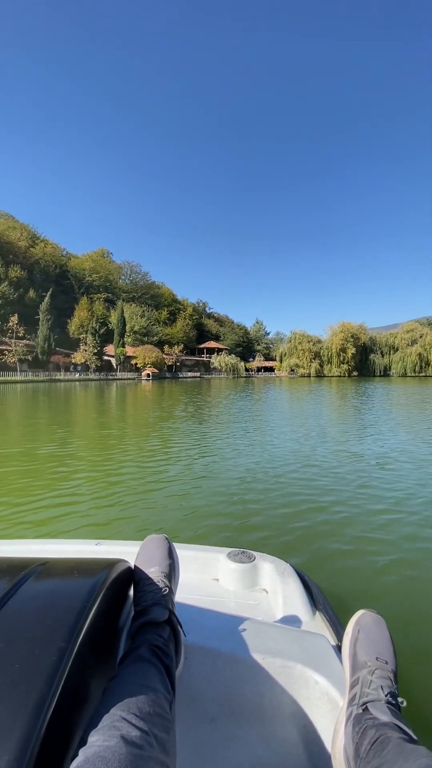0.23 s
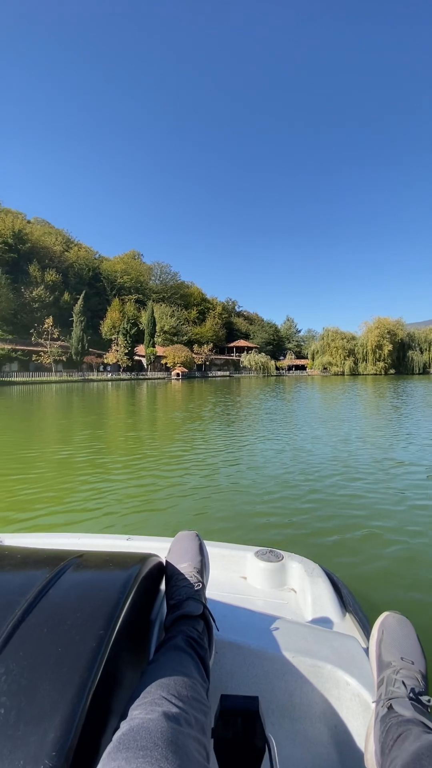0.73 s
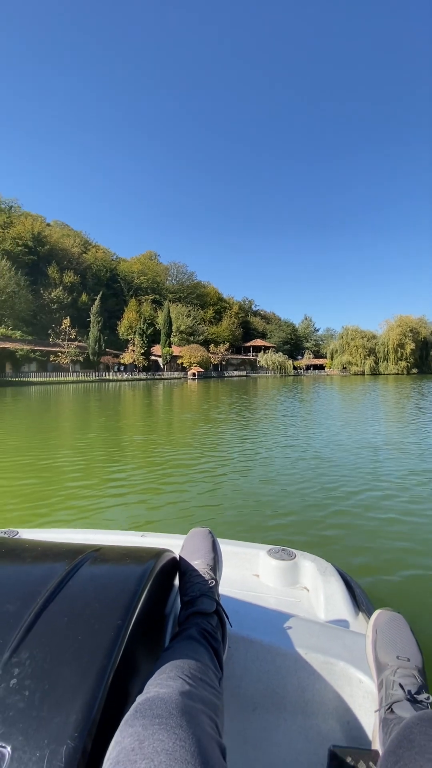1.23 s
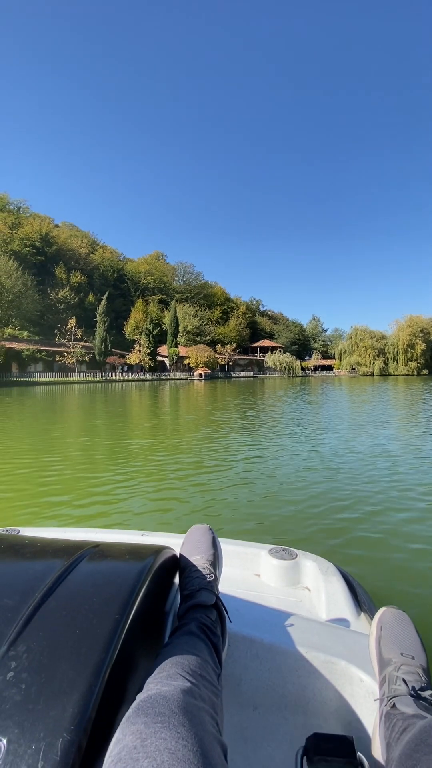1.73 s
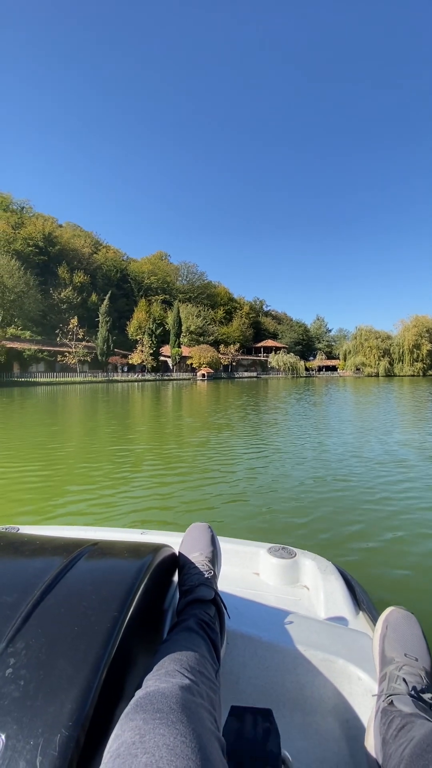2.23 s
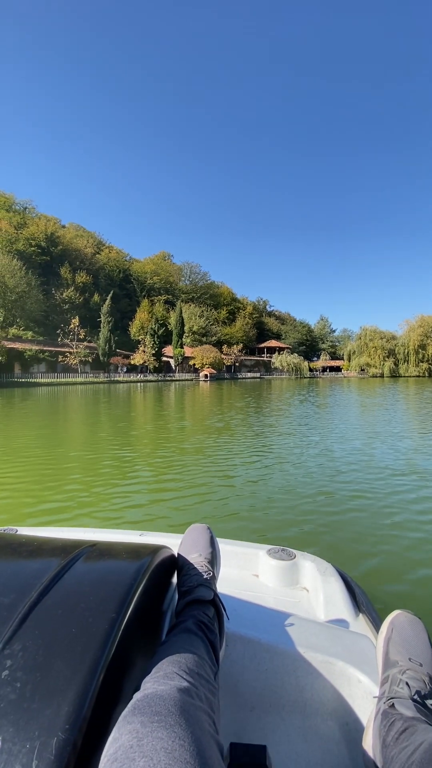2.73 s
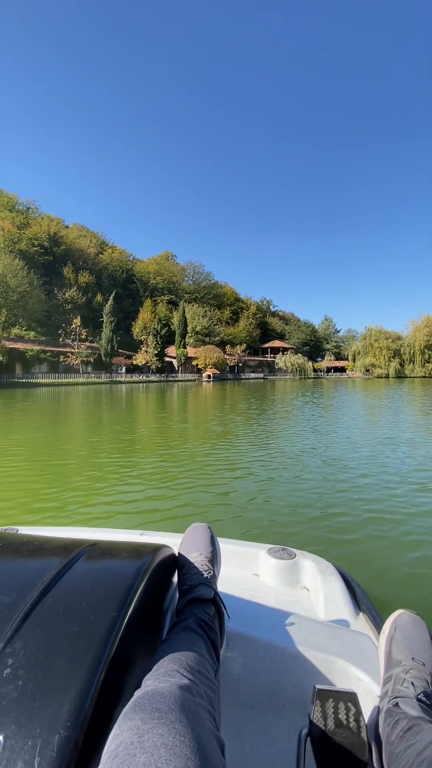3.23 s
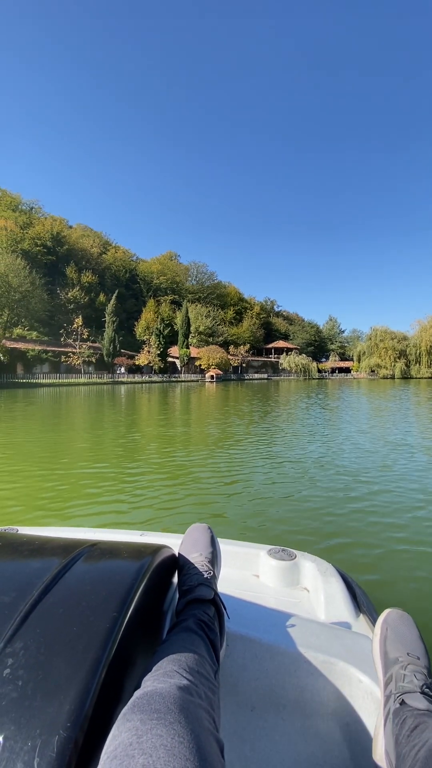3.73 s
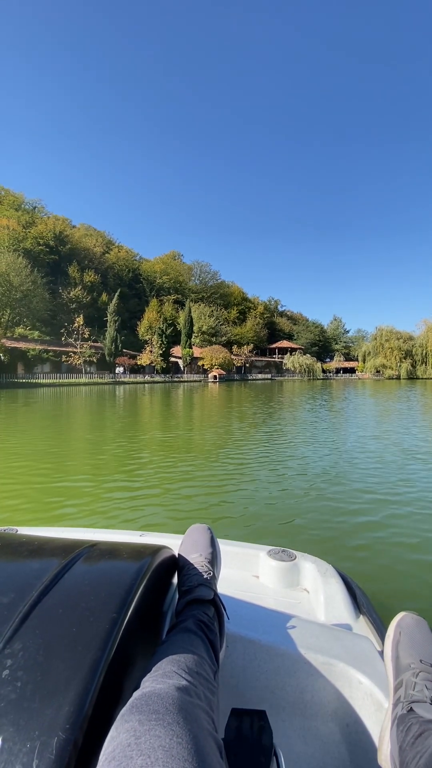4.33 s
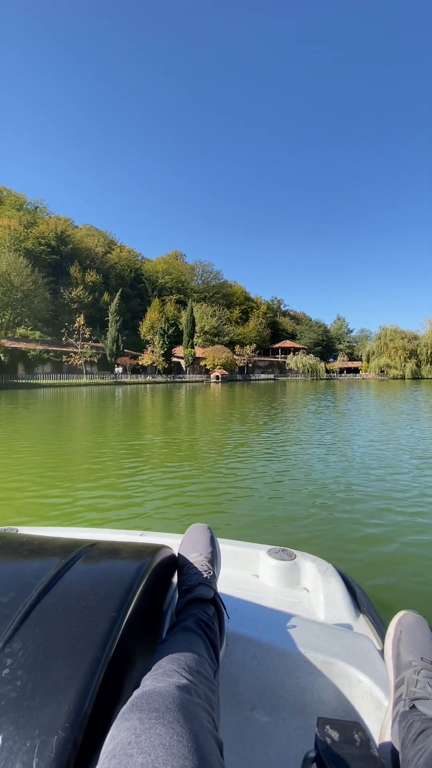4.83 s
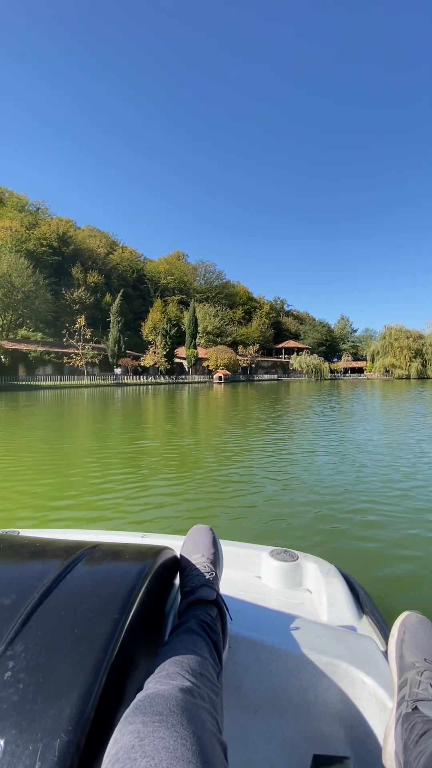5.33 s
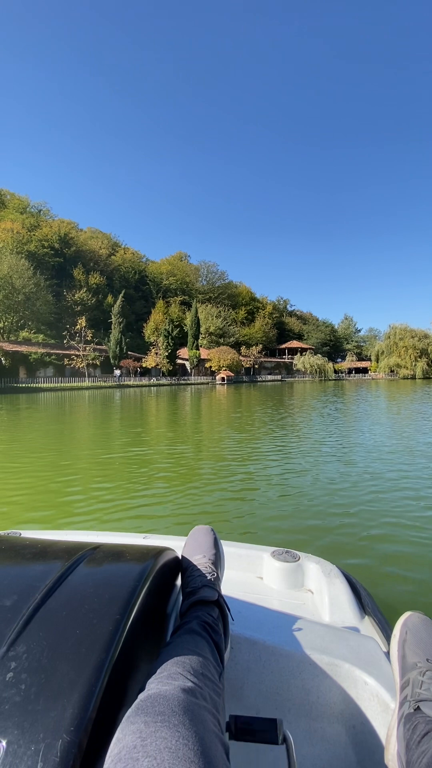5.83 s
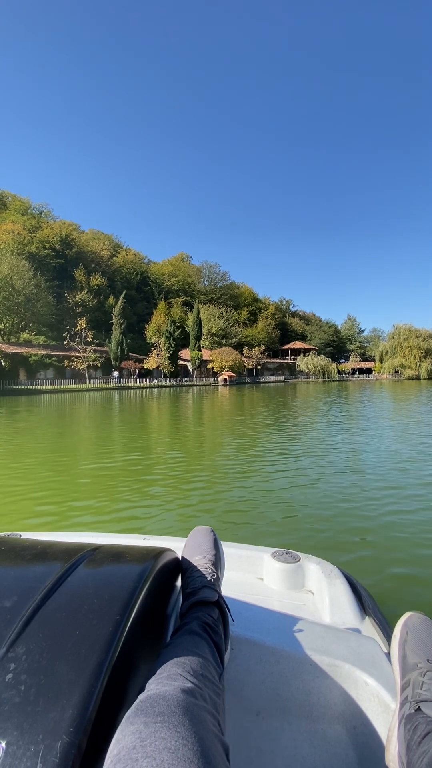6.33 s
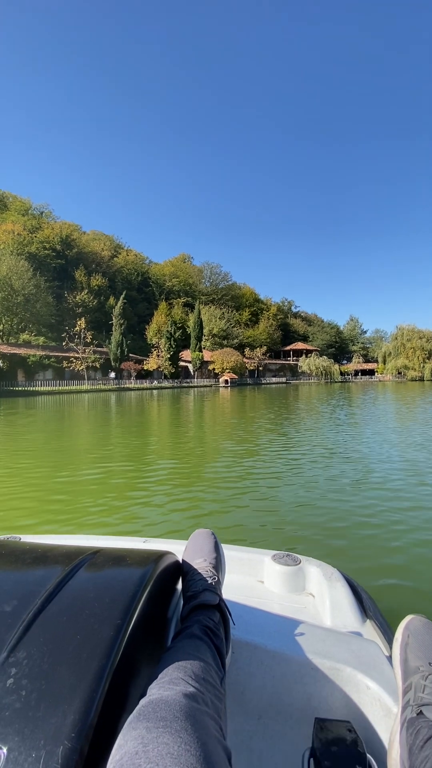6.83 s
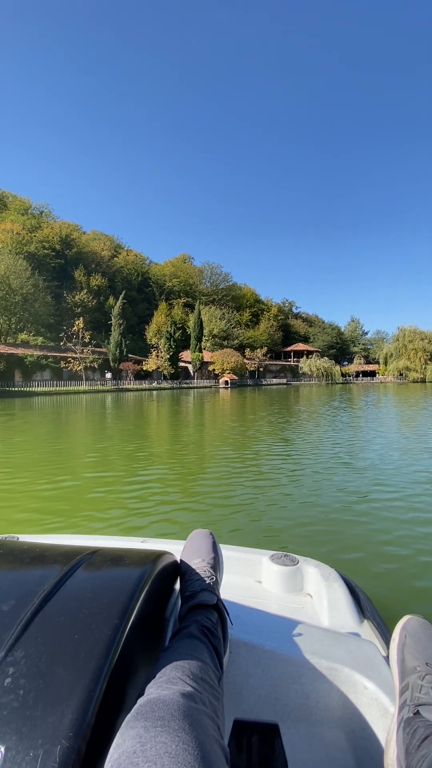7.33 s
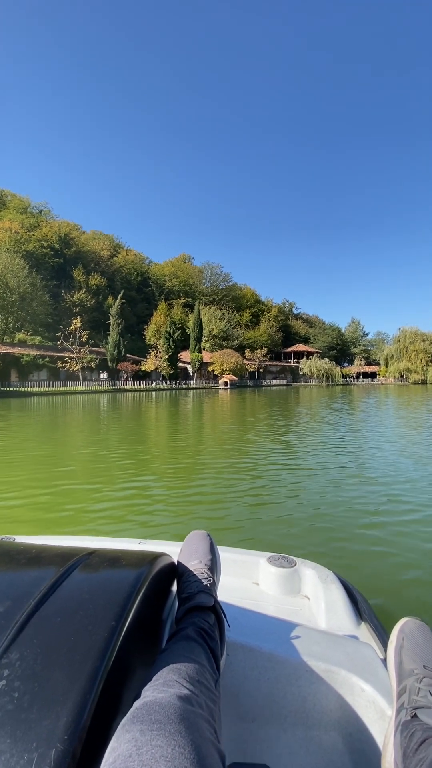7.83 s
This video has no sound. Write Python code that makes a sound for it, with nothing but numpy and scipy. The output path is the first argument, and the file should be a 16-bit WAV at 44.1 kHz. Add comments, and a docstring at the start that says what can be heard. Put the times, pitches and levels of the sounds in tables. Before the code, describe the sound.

Close, rhythmic splashing runs from start to finish as the paddle wheel of a pedal boat churns the lake. Each blade slaps in and pulls air under with a low gulp, and some land flat with a brighter smack. Around this slightly irregular beat, water fizzes, drips and gurgles, heaving against the hollow plastic hull and making small pings in the paddle housing.

```python
"""A pedal boat's paddles beat across a lake. Each blade splashes in, scatters drops and drags a pocket of
air under, which gulps at a low pitch while the slap rings the hollow plastic hull. The water shuts
over the pocket with a knock, and a blade that lands flat adds a bright crack. Wash, deep heaves, plops,
pings and gurgles run on between the beats, and the water keeps the hull and the paddle box ringing."""
import sys
import numpy as np
from scipy import signal
from scipy.fft import rfft, irfft
from scipy.io import wavfile

SR = 44100
rng = np.random.default_rng(int(sys.argv[2]) if len(sys.argv) > 2 else 0)


def waveform_to_disk(signal):
    """Save audio, clipped to [-1, 1], as 16-bit WAV at the path in sys.argv[1]."""
    frames = np.transpose(np.atleast_2d(signal))
    scaled = np.clip(frames, -1, 1) * 32767
    samples = np.round(scaled).astype(np.int16)
    wavfile.write(sys.argv[1], SR, samples)


N = 357210


def from_db(db):
    """Decibels to gain."""
    return 10 ** (np.asarray(db) / 20)


def rms_one(x):
    """Scale to unit rms."""
    return x / np.sqrt(np.mean(x ** 2) + 1e-20)


def drift(rate_hz):
    """Smooth random modulator, rms about 1: noise twice through a one-pole low-pass."""
    step, run_in = 40, 2000
    pole = np.exp(-2 * np.pi * rate_hz * step / SR)
    noise = rng.standard_normal(N // step + run_in + 2)
    slow = signal.lfilter([1], [1, -2 * pole, pole * pole], noise)[run_in:]
    return np.interp(np.arange(N) / step, np.arange(len(slow)), rms_one(slow))


def butter(hz, kind, order=2):
    """Butterworth filter sections."""
    return signal.butter(order, hz, kind, fs=SR, output="sos")


def ring(clicks, hz, t60):
    """Resonator: a unit click sets a sine of height 1 ringing."""
    r, w = from_db(-60 / (t60 * SR)), 2 * np.pi * hz / SR
    return signal.lfilter([0, np.sin(w)], [1, -2 * r * np.cos(w), r * r], clicks + 1e-18)


def add(out, s, sound):
    """Mix a short sound in at s seconds."""
    i = round(s * SR)
    out[..., i:i + sound.shape[-1]] += sound[..., :N - i]


def patchy_noise(eq, shared_db, shared_hz, own_db, own_hz):
    """Two noises in half-octave bands that swell partly together, partly alone, then an EQ; rms 1."""
    noise, together = 0, drift(shared_hz)
    edges = np.minimum(20 * 2 ** np.arange(0, 10.1, .5), 19000)
    white = rng.standard_normal((2, 2, N))
    for k in range(len(edges) - 1):
        band = signal.sosfilt(butter(edges[k:k + 2], "band"), white[k % 2])
        noise = noise + band * from_db(shared_db * together + own_db * drift(own_hz))
    hz, db = np.transpose(eq)
    grid = np.arange(N // 2 + 1) * SR / N + 1
    curve = from_db(np.interp(np.log(grid), np.log(hz), db))
    return rms_one(irfft(rfft(noise) * curve, N))


def fizz(per_s, low_hz, high_hz, cycles, spread_db):
    """Small bubbles burst at random and ring some cycles; two unrelated swarms, rms 1."""
    sizes = from_db(spread_db * np.minimum(rng.exponential(1, (2, N)), 5)) * rng.choice([-1, 1], (2, N))
    bursts = sizes * (rng.random((2, N)) < per_s / SR)
    pitch_index = rng.integers(0, 16, (2, N))
    pitches = np.geomspace(low_hz, high_hz, 16)
    return rms_one(sum(ring(bursts * (pitch_index == k), hz, cycles / hz) for k, hz in enumerate(pitches)))


def bubble(db, hz, length, glide_oct, attack, firm, trough_s=None):
    """A gliding sine, like a ringing pocket of air; firm 1 fades evenly, more holds and then collapses."""
    t = np.arange(round(4 * length * SR)) / SR
    pitch = hz * 2 ** (glide_oct * (np.minimum(t / length, 2) - .5))
    phase = 2 * np.pi * np.cumsum(pitch) / SR
    envelope = (1 - np.exp(-t / attack)) * np.exp(-(t / length) ** firm)
    start = rng.uniform(0, 2 * np.pi)
    if trough_s is not None:   # land a trough of the wave on that moment
        start = np.pi - np.interp(trough_s, t, phase)
    return from_db(db) * envelope * np.cos(phase + start)


# EQ of the rushing water: f/Hz, level/dB
WATER_EQ = [(100, 10), (160, 7), (230, 3), (400, 0), (700, -6.5), (1050, -8.5), (1250, -18), (1800, -17),
            (2550, -11), (3300, -11), (4200, -17), (5000, -14.5), (6500, -18.5), (8300, -21.5),
            (12000, -24.5), (15500, -31.5)]
# EQ of the rumble under the hull: f/Hz, level/dB
RUMBLE_EQ = [(25, -45), (38, -26), (55, 15), (75, 7.5), (110, -34), (200, -24), (500, -48)]
# fader rides of the wash: t/s, rumble level/dB, water level/dB
WASH_FADERS = [(0.0, -55, -44), (0.43, -44, -42.5), (0.95, -59, -45), (1.26, -52, -42), (1.69, -55, -43),
               (2.0, -69, -43), (2.3, -53, -43.5), (2.78, -52, -44), (3.09, -44, -42.5), (3.35, -61, -43),
               (4.31, -53, -46), (4.7, -41, -42.5), (5.21, -58, -43.5), (5.661, -55, -41.5),
               (5.96, -58, -45.5), (6.56, -60, -42), (6.88, -54, -43.5), (7.17, -60, -43.5),
               (8.1, -54, -45)]


def wash():
    """The bed: rumble under the hull, rushing water and scattered gurgles, long and short."""
    water = patchy_noise(WATER_EQ, shared_db=.64, shared_hz=13.5, own_db=2.9, own_hz=11.7)
    water += (churn() - 1) * signal.sosfiltfilt(butter(580, "low"), water)
    water += .11 * fizz(110, 192, 1063, cycles=45, spread_db=3.5)
    water += .18 * fizz(500, 900, 6000, cycles=50, spread_db=2.5)
    water += .2 * fizz(160, 550, 2000, cycles=20, spread_db=2.5)
    rumble = patchy_noise(RUMBLE_EQ, shared_db=1, shared_hz=2.7, own_db=.5, own_hz=11)
    s, rumble_db, water_db = np.transpose(WASH_FADERS)
    t = np.arange(N) / SR
    return from_db(np.interp(t, s, rumble_db)) * rumble + from_db(np.interp(t, s, water_db)) * water


def churn(depth_db=2):
    """Gain around 0 dB for the low wash, which swells behind each paddle and sinks before the next."""
    swells, t = np.zeros(N), np.arange(SR // 2) / SR
    for s, *_ in AIR_POCKETS:
        add(swells, s, (1 - np.exp(-t / .008)) * np.exp(-t / .06))
    return from_db(depth_db * rms_one(swells - swells.mean()))


# modes of the hollow plastic hull: f/Hz, level/dB, t60/s
HULL_MODES = [(266.4, 1, 0.15), (345.4, -8.5, 0.19), (380, -5, 0.11), (524.6, -13.5, 0.18),
              (617.7, -13.5, 0.25), (771, -16, 0.32), (1011, -20.5, 0.24), (4980, -45, 0.037)]


def hull_hum(water, level_db=-50, tilt_db_per_oct=4, wet_t60_share=.6):
    """Splashes and wash keep the hull modes gurgling fitfully, each mode in its own time."""
    hum = 0
    for hz, db, t60 in HULL_MODES:
        gain = from_db(db + tilt_db_per_oct * np.log2(hz / HULL_MODES[0][0]) + 5 * drift(12))
        hum = hum + gain * rms_one(ring(water, hz, wet_t60_share * t60))
    return from_db(level_db) * rms_one(hum)


def paddle_box(water, level_db=-62, modes_hz=(2420, 2490)):
    """Drops strike the box fitfully, as hard as the water is bright; its close modes ring in dashes."""
    strikes = signal.sosfilt(butter(1500, "high"), water) * rng.choice([-1, 1], water.shape)
    ringing = sum(ring(strikes * from_db(4 * drift(20)), hz, t60=.045) for hz in modes_hz)
    return from_db(level_db) * rms_one(ringing)


# EQ of the spray: f/Hz, level/dB
SPRAY_EQ = [(200, 15), (600, 14), (1050, 8.5), (1250, 2), (1800, -6.5), (2500, 3), (3300, 1.5), (4200, -10),
            (5200, -0.5), (7000, -9), (9000, -9.5), (12500, -16.5), (15500, -18)]
# paddles entering the water: t/s, level/dB, t60/s (capped at 0.6), treble gain/dB, attack/s
PADDLE_HITS = [(0.016, -50.5, 0.27, 8, 0.004), (0.178, -44.5, 0.36, 6.5, .01),
               (0.374, -51.5, 0.57, 11, 0.0023), (0.44, -62, .3, 3, 0.012), (0.612, -56, 0.19, 23, 0.013),
               (0.88, -46.5, 0.13, 11, 0.0046), (1.069, -43, 0.24, 2, 0.0039),
               (1.259, -40.5, 0.22, 8, 0.0014), (1.385, -57, 0.26, 17, .01), (1.463, -42, 0.34, 6, .004),
               (1.699, -44, 0.26, -15, 0.0092), (1.912, -46.5, 0.4, 1, 0.0057),
               (1.99, -56.5, 0.27, 18, 0.0072), (2.114, -41, 0.3, 5.5, 0.013), (2.334, -41, 0.22, 8, .005),
               (2.56, -43, 0.56, -1, 0.015), (2.777, -41.5, 0.29, 0.5, .006), (2.792, -53, 0.38, -1, .002),
               (2.979, -48.5, 0.52, 9.5, 0.0027), (3.19, -40.5, 0.28, 4, 0.0046),
               (3.464, -44, 0.19, 5.5, 0.0072), (3.648, -44.5, 0.66, 5, 0.0044),
               (3.85, -43.5, 0.3, 4.5, 0.0043), (3.907, -40.5, 0.18, -32, 0.0022),
               (4.069, -39, 0.22, 9, 0.024), (4.321, -41, 0.28, -3, 0.015), (4.537, -45, 0.43, -14, .004),
               (4.715, -39.5, 0.43, 1.5, 0.0046), (4.895, -45, 0.44, 6.5, 0.011),
               (4.921, -45, 0.49, 0, 0.0022), (4.975, -47, 0.29, -12, .003),
               (5.154, -42.5, 0.35, -17, 0.0048), (5.358, -43.5, 0.17, 1, 0.0017),
               (5.549, -49, 0.31, 11.5, 0.0028), (5.755, -43.5, 0.36, 7.5, 0.014),
               (5.813, -49, 0.17, -24, .003), (5.991, -45.5, 0.59, 5, .008), (6.202, -45.5, 0.71, 9, 0.011),
               (6.402, -48, 0.4, 9.5, 0.0031), (6.607, -45.5, 0.32, 0, 0.0036),
               (6.626, -50.5, 0.24, 8, .004), (6.723, -50, 0.22, 8, 0.005), (6.89, -44.5, 0.16, 6, 0.0045),
               (7.072, -47, 0.6, 1, 0.0073), (7.244, -45.5, 0.48, 9.5, 0.006),
               (7.452, -36, 0.27, 3.5, 0.018), (7.665, -42.5, 0.81, 0, 0.018), (7.893, -43, 0.46, 5, .002)]


def splashes():
    """Thrown water spatters and fizzes, with one envelope for its body and one for its treble."""
    envelopes, t = smack_envelopes(), np.arange(SR // 2) / SR
    # each slap also spits a little bright spray
    spits = [(s, slap_db - 32.5, .18, 17, .0093) for s, *_, slap_db in AIR_POCKETS]
    for s, db, t60, treble_db, attack in PADDLE_HITS + spits:
        burst = (1 - np.exp(-t / attack)) * from_db(db - 60 * t / min(t60, .6))
        add(envelopes, s, burst * from_db([[0], [treble_db]]))
    spray = patchy_noise(SPRAY_EQ, shared_db=1.96, shared_hz=60, own_db=2.5, own_hz=30)
    spray += .3 * fizz(900, 1500, 6500, cycles=28, spread_db=3)
    spray += .19 * fizz(320, 462, 1203, cycles=71, spread_db=3)
    low, high = (signal.sosfilt(butter(3000, kind), spray) for kind in ("low", "high"))
    body, treble = envelopes
    return body * low - treble * high


def drops(per_splash=24, low_hz=700, high_hz=6000, latest_s=.18, cycles=22):
    """Every splash scatters drops that tick 10 to 20 dB under it, thickest at the start."""
    out = np.zeros(N)
    for s, db, *_ in PADDLE_HITS:
        for late, small, high in rng.random((per_splash, 3)):
            hz = low_hz * (high_hz / low_hz) ** high
            tick = bubble(db - 10 - 10 * small, hz, cycles / hz, glide_oct=.025, attack=1.5 / hz, firm=1.2)
            add(out, s + latest_s * late ** 2, tick)
    return out


# air pulled under, one pocket a paddle, at times two: t/s, level/dB, f/Hz, length/s, slap level/dB
AIR_POCKETS = [(0.018, -32, 199, 0.071, -29), (0.235, -29.5, 158.5, 0.13, -26),
               (0.445, -35, 235, 0.047, -25.5), (0.635, -32, 319.5, 0.047, -30.5),
               (0.883, -41, 269, 0.067, -29), (1.138, -32, 146.8, 0.13, -26.5),
               (1.345, -23, 151.7, 0.063, -26.5), (1.516, -33, 253, 0.088, -27),
               (1.736, -31.5, 245, 0.062, -28), (1.986, -26, 158.4, 0.12, -32),
               (2.186, -25.5, 171.7, 0.073, -23), (2.383, -22.5, 266, 0.026, -28.5),
               (2.621, -27.5, 186.5, 0.035, -25.5), (2.844, -33, 164, 0.036, -28.5),
               (3.051, -27, 167.6, 0.055, -27.5), (3.17, -31, 150, 0.02, -55),
               (3.239, -29.5, 262.6, 0.06, -24), (3.467, -38, 203.5, 0.097, -29),
               (3.707, -24, 164.6, 0.056, -33), (3.902, -36, 222, 0.051, -31),
               (4.111, -33, 330, 0.027, -25.5), (4.274, -34, 380, 0.035, -34),
               (4.365, -30.5, 206, 0.039, -28.5), (4.598, -26.5, 147, 0.085, -26),
               (4.67, -43, 147, 0.061, -49), (4.801, -24.5, 156.5, 0.071, -28),
               (4.964, -38.5, 244, 0.12, -27), (5.2, -34.5, 184.3, 0.084, -27),
               (5.421, -29.5, 161, 0.079, -30), (5.609, -32.5, 168, 0.061, -27),
               (5.719, -39, 179, 0.07, -56), (5.813, -31.5, 292, 0.035, -24), (6.048, -30, 223, 0.05, -28),
               (6.278, -34, 172, 0.068, -30), (6.479, -26, 164, 0.046, -23.5),
               (6.671, -31, 249.4, 0.085, -24), (6.901, -31.5, 190.3, 0.083, -29),
               (7.128, -27.5, 159.5, 0.11, -26), (7.318, -28.5, 163.4, 0.11, -26),
               (7.505, -33, 279, 0.044, -22.5), (7.738, -37.5, 198, 0.056, -32),
               (7.964, -35, 174, 0.057, -32)]


def gulps():
    """A pocket wobbles and sags in pitch as it goes down; its wave dips as the water shuts over it."""
    out = np.zeros(N)
    for s, db, hz, length, _ in AIR_POCKETS:
        shut_s = next((at - s for at, _ in POCKET_SHUTS if 0 < at - s < .03), None)
        add(out, s, bubble(db, hz, length, glide_oct=-.15, attack=.007, firm=1.5, trough_s=shut_s))
    return out * from_db(1.6 * drift(37))


def slaps(shake_db=-27):
    """With each pocket a short rush of jolts slaps wetly and shakes the hull modes."""
    jolts, t = np.zeros(N), np.arange(SR // 10) / SR
    for s, *_, slap_db in AIR_POCKETS:
        add(jolts, s, from_db(slap_db) * (1 - np.exp(-t / .0041)) * np.exp(-t / .011))
    hull = np.zeros(N)
    for hz, mode_db, t60 in HULL_MODES:
        shake = jolts * rng.standard_normal(N) * from_db(shake_db + mode_db + 1.86 * drift(5))
        hull += ring(shake, hz, t60)
    return hull + signal.sosfilt(butter([150, 1000], "band"), jolts * rng.standard_normal(N))


# blades landing flat: t/s, level/dB
FLAT_SMACKS = [(0.21, -42), (0.375, -39.5), (1.485, -48), (2.341, -37.5), (2.794, -35), (2.981, -39),
               (3.857, -43), (4.542, -39), (4.719, -47), (4.81, -44), (4.923, -51), (5.361, -39),
               (5.429, -41), (5.552, -43), (6.405, -35), (6.63, -45), (7.703, -38.5), (7.975, -43)]


def smack_envelopes(attack_s=.0015, decay_s=.017, body_db=-15.5):
    """A flat blade cracks brightly: a snap in the spray's body and treble envelopes."""
    out, t = np.zeros((2, N)), np.arange(SR // 2) / SR
    snap = (1 - np.exp(-t / attack_s)) * np.exp(-t / decay_s)
    for s, db in FLAT_SMACKS:
        add(out, s - attack_s, from_db([[db + body_db], [db]]) * snap)
    return out


# water closing over a pocket: t/s, level/dB
POCKET_SHUTS = [(0.253, -26), (0.4511, -22), (0.6521, -29), (0.9005, -29.5), (1.1523, -25), (1.356, -35),
                (1.5331, -40), (1.747, -29), (2.0017, -48), (2.205, -40), (2.3999, -38), (2.6376, -37),
                (2.8568, -47), (3.0689, -46), (3.2565, -35), (3.4789, -31), (3.7198, -47), (3.9214, -24),
                (4.613, -43), (4.8173, -28), (4.9891, -27), (5.4356, -26.5), (5.6357, -22.5), (5.831, -32),
                (6.2886, -32.0), (6.4943, -24), (6.6839, -32.5), (7.1415, -27.5), (7.3409, -26.5),
                (7.5259, -42), (7.769, -27), (7.98, -38)]


def knocks(half_width_s=.0013, lead_s=.008):
    """The water shuts with a sharp knock: one downward pulse between two small swells."""
    out, t = np.zeros(N), np.arange(SR // 10) / SR
    offset_squared = ((t - lead_s) / half_width_s) ** 2
    knock = (offset_squared - 1) * np.exp(-offset_squared / 2)
    for s, db in POCKET_SHUTS:
        add(out, s - lead_s, from_db(db) * knock)
    return out


# heaves of water: t/s, level/dB, f/Hz
HULL_HEAVES = [(0.26, -29, 66), (0.386, -28, 64.5), (0.487, -37, 55.7), (0.758, -27, 65), (1.14, -46, 86),
               (1.284, -28, 75), (1.358, -27, 85), (1.589, -31, 62), (1.678, -28.5, 80),
               (2.21, -29.5, 78.5), (2.846, -36, 72), (3.073, -30, 77), (3.258, -45, 69), (3.703, -35, 78),
               (3.926, -29, 65), (4.497, -26, 55), (4.653, -24, 76), (4.86, -26.5, 89), (4.993, -28.5, 73),
               (5.054, -34, 64), (5.443, -34, 63), (5.637, -32, 57.3), (6.145, -35, 74), (6.352, -31, 70.5),
               (6.541, -31, 70.5), (6.933, -39, 62), (7.144, -33, 72), (7.326, -29, 72), (7.748, -29, 86),
               (7.988, -28, 71)]


def heaves():
    """Water heaves against the hull in soft, deep thumps."""
    out = np.zeros(N)
    for s, db, hz in HULL_HEAVES:
        add(out, s, bubble(db, hz, length=.032, glide_oct=-.099, attack=.013, firm=1.8))
    return out


# short pitched sounds that stand out: t/s, level/dB, f/Hz, length/s
PITCHED_ACCENTS = [(0.385, -39, 500, .02), (0.482, -37, 970, .022), (0.541, -44, 2250, .014),
                   (0.845, -48, 1450, .014), (0.991, -44, 950, .015), (1.08, -40, 506, .015),
                   (1.248, -40, 950, .015), (1.268, -39, 2430, .012), (1.444, -41, 2450, .007),
                   (1.664, -40, 390, .025), (1.839, -43, 1290, .014), (1.947, -43, 991, .018),
                   (2.195, -40, 600, .015), (2.308, -40, 2500, .009), (2.53, -43, 2500, .014),
                   (2.568, -45, 1650, .01), (2.592, -40, 2450, .01), (2.64, -42, 390, .07),
                   (2.79, -44, 1700, .012), (2.832, -44, 1855, .016), (2.977, -46, 1980, .01),
                   (3.022, -35, 2760, .008), (3.16, -40, 420, .03), (3.192, -41, 2600, .008),
                   (3.198, -37, 440, .022), (3.205, -39, 2480, .009), (3.385, -44, 840, .02),
                   (3.415, -41, 800, .025), (3.508, -42, 580, .015), (3.57, -43, 370, .08),
                   (3.66, -42, 2480, .01), (3.76, -43, 385, .08), (3.855, -41, 2600, .012),
                   (3.993, -42, 2450, .007), (4.021, -34, 885, .028), (4.926, -36, 2670, .01),
                   (4.975, -43, 1580, .012), (4.983, -42, 4820, .006), (5.155, -44, 2480, .012),
                   (5.309, -44, 1000, .015), (5.36, -42, 2370, .012), (5.421, -39, 600, .022),
                   (5.553, -41, 560, .025), (5.77, -39, 340, .035), (5.943, -44, 1000, .02),
                   (6.067, -38, 600, .018), (6.413, -40, 2480, .01), (6.421, -43, 970, .016),
                   (6.433, -44, 1515, .012), (6.628, -35, 2410, .013), (6.668, -39, 760, .015),
                   (6.745, -42, 800, .02), (6.835, -47, 2420, .014), (6.86, -44, 760, .04),
                   (7.069, -39, 2460, .014), (7.205, -44, 990, .04), (7.47, -43, 600, .018),
                   (7.638, -41, 830, .014), (7.66, -44, 2420, .014), (7.67, -41, 840, .012),
                   (7.702, -43, 2450, .01), (7.893, -43, 2250, .012)]


def accents():
    """Bubble plops, pings of the paddle box and low hull gurgles start quickly and bend up a little."""
    out = np.zeros(N)
    for s, db, hz, length in PITCHED_ACCENTS:
        add(out, s, bubble(db, hz, length, glide_oct=.025, attack=1.5 / hz, firm=1.2))
    return out


# stereo image by frequency: f/Hz, left phase lead/rad, likeness/0-1, left over right/dB
STEREO_IMAGE = [(20, -.05, .98, .3), (120, -.03, .975, -1.5), (300, .1, .99, -3.5), (550, .95, .9, -4),
                (950, 1.05, .88, -.5), (1400, .55, .76, 2.5), (1950, .8, .7, 1.5), (2350, .5, .15, 3),
                (2700, 2.7, .55, .3), (3300, 2.0, .72, -.5), (4000, 1.0, .6, -2), (4750, 1.9, .15, 1.5),
                (5250, .3, .72, .3), (6300, 1.3, .65, -.5), (7000, 2.9, .96, 0), (8100, 3.4, .96, 0),
                (9000, 4.7, .6, -.5), (10300, 6.28, .99, 0), (12000, 7.5, .65, 0), (12600, 9.2, .97, 0),
                (14300, 9.6, .97, 0), (15500, 12.55, .85, 0)]


def stereo(shared, scattered):
    """Left and right vary in phase, likeness and balance, and are nearly opposite in two treble bands."""
    grid = np.arange(N // 2 + 1) * SR / N
    hz, *columns = np.transpose(STEREO_IMAGE)
    lead, alike, balance_db = (np.interp(grid, hz, column) for column in columns)
    mid = np.sqrt((1 + alike) / 2) * rfft(shared)
    side = np.sqrt((1 - alike) / 2) * rfft(scattered)
    pan = from_db(balance_db / 2) * np.exp(.5j * lead)
    return np.array([irfft((mid + side) * pan, N), irfft((mid - side) / pan, N)])


def scene():
    """The beat of the paddle wheel over the wash, in stereo."""
    beat = gulps() + slaps() + knocks() + heaves()
    drips = (drops() + accents()) * from_db(2.8 * drift(80))   # they flutter in the slosh
    water = splashes() + wash()
    shared, scattered = water + paddle_box(water) + hull_hum(water)
    echo = np.concatenate([np.zeros(180), beat[:-180]])   # 4 ms, off the far side of the hull
    return stereo(shared + beat + drips, scattered + .29 * echo + .34 * drips)


def record(dry):
    """The microphone loses the deepest bass; the top is cut steeply."""
    thin = signal.sosfiltfilt(butter(36, "high", order=3), dry)
    return signal.sosfilt(signal.cheby2(14, 70, 16090.8, fs=SR, output="sos"), thin)


dry = scene()
out = record(dry)
waveform_to_disk(out)
```